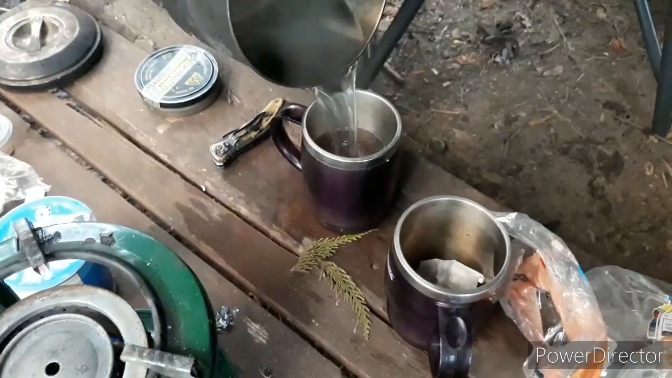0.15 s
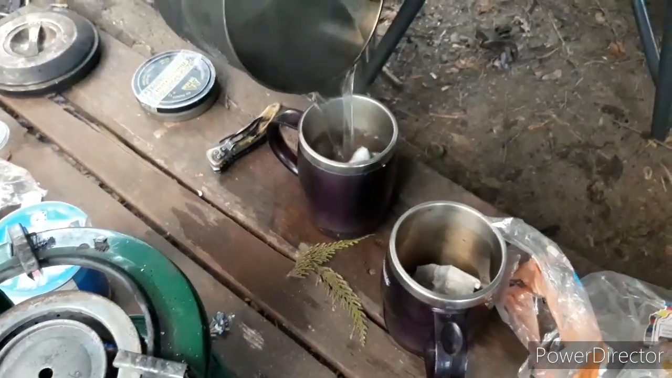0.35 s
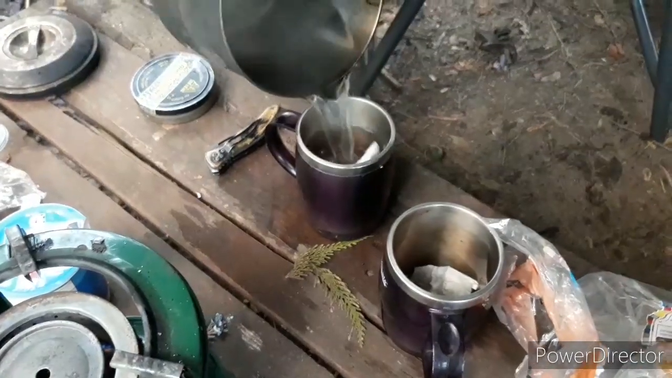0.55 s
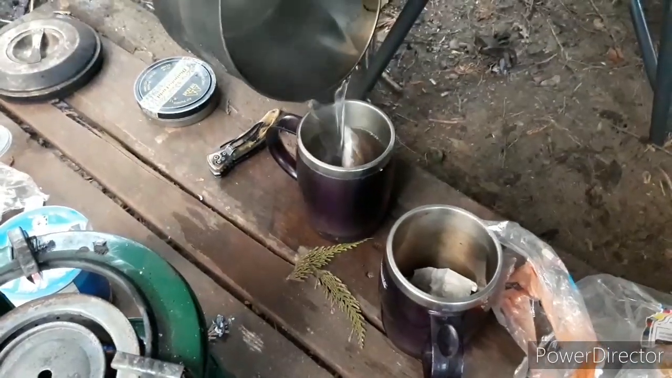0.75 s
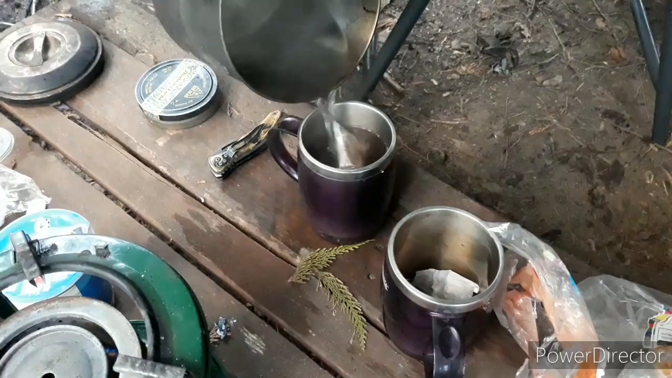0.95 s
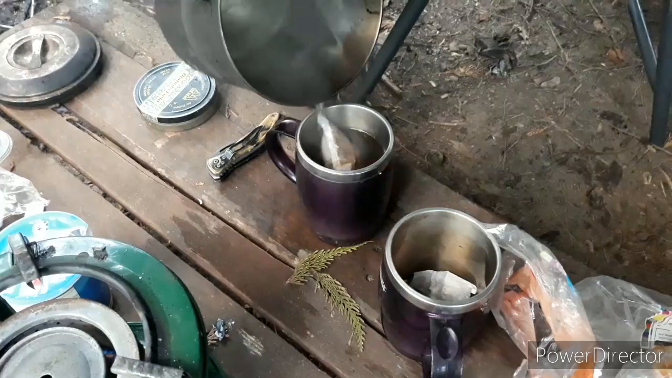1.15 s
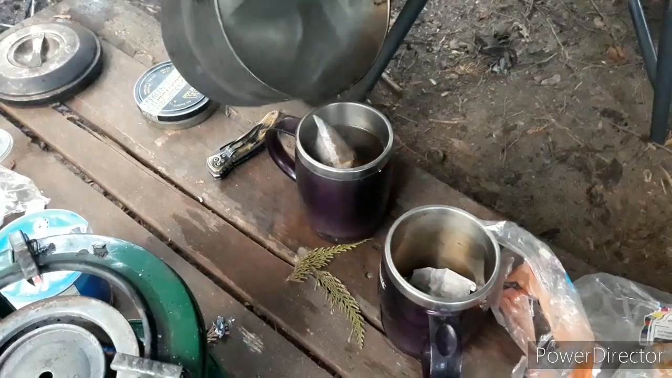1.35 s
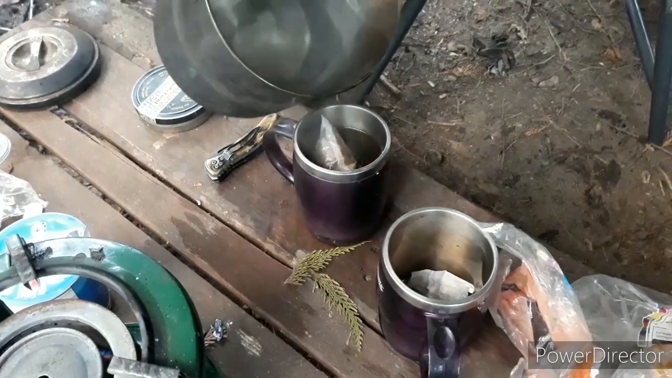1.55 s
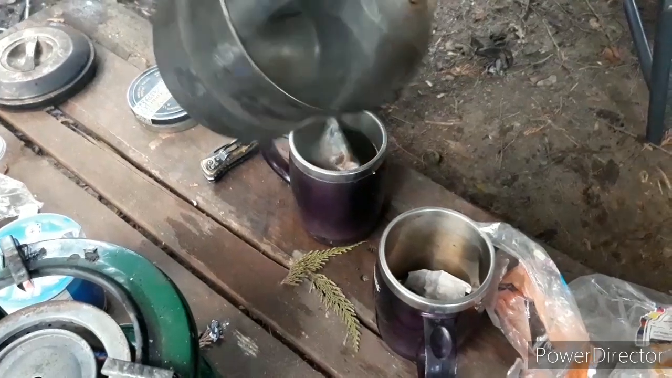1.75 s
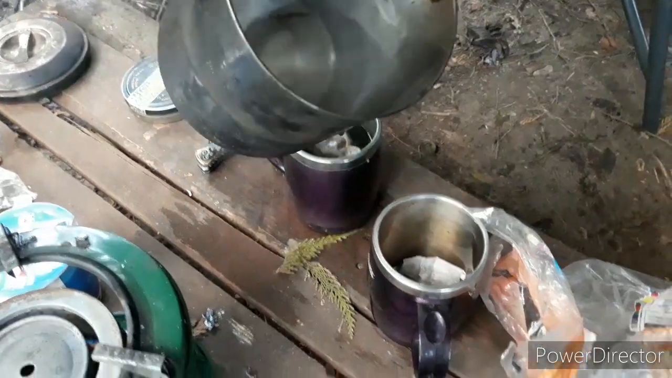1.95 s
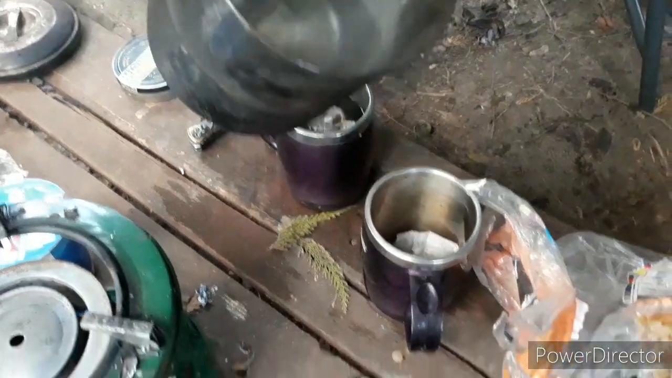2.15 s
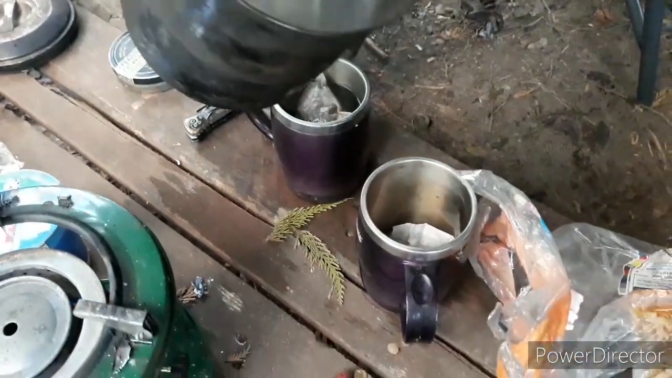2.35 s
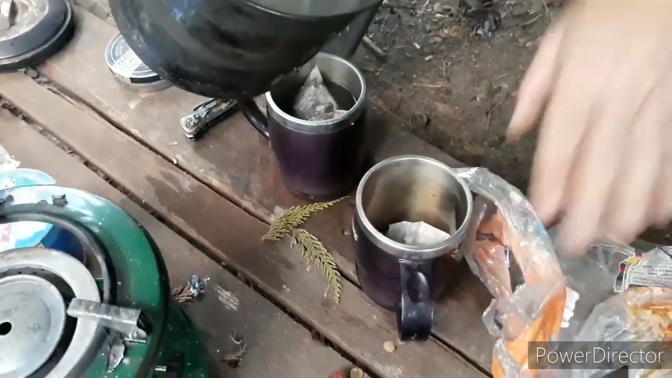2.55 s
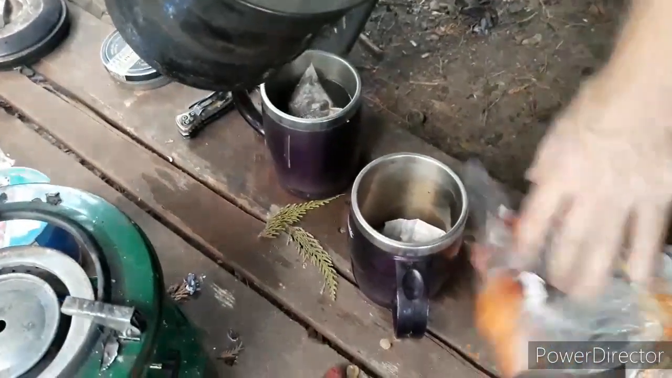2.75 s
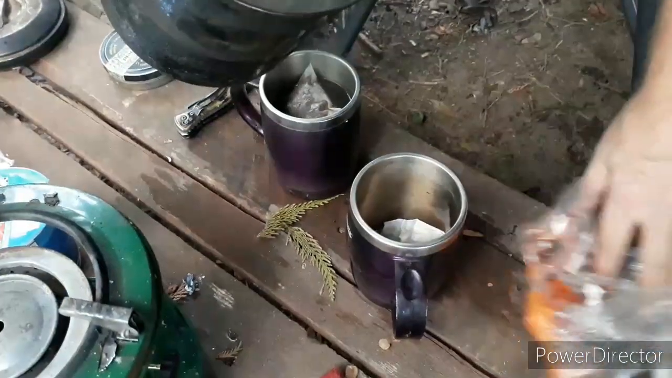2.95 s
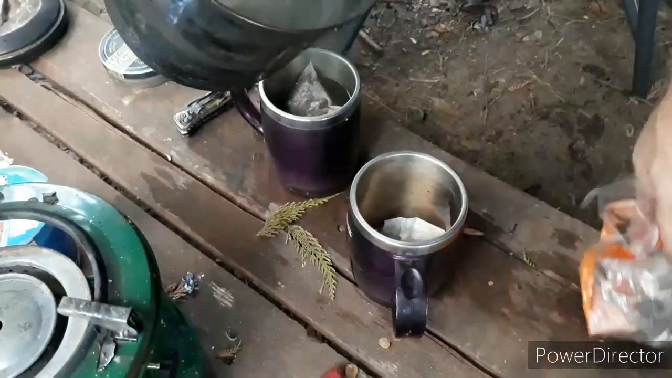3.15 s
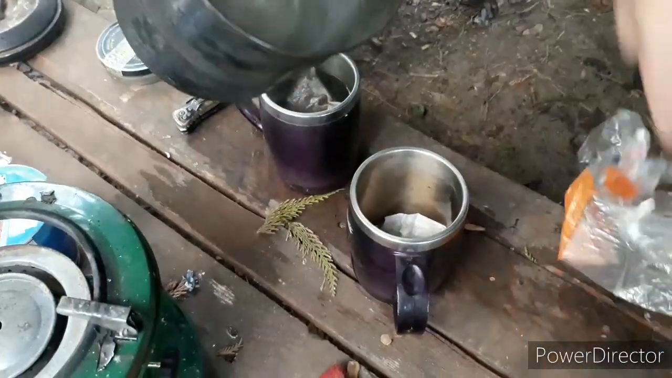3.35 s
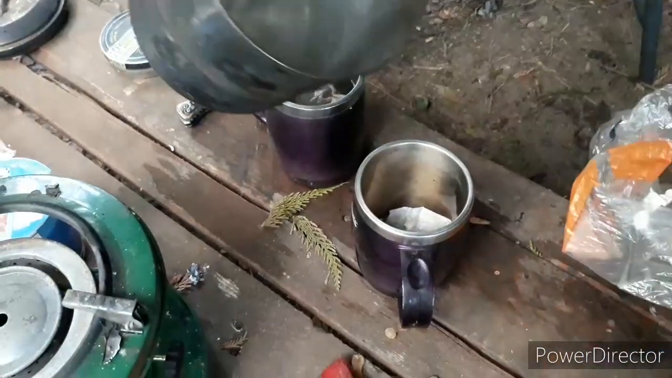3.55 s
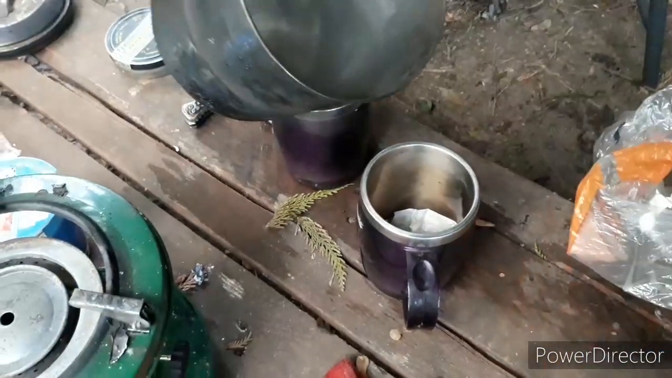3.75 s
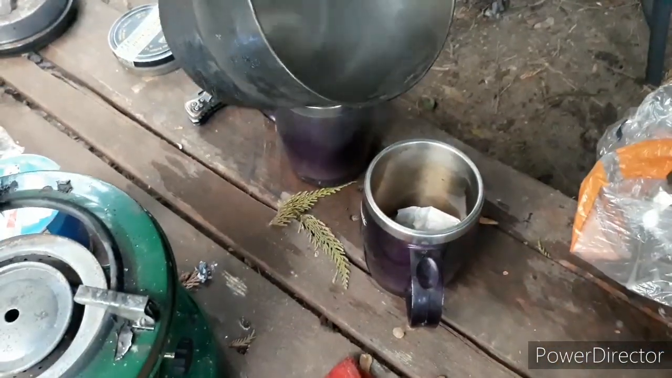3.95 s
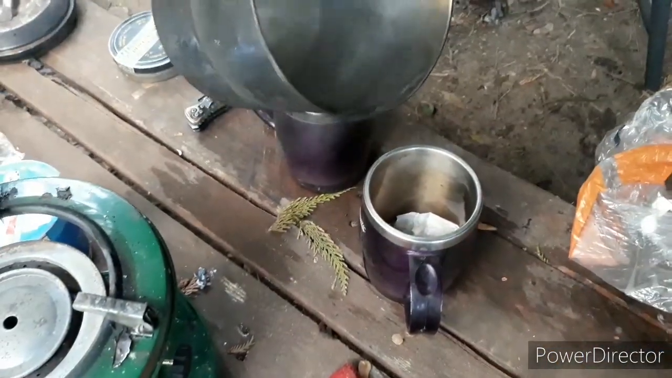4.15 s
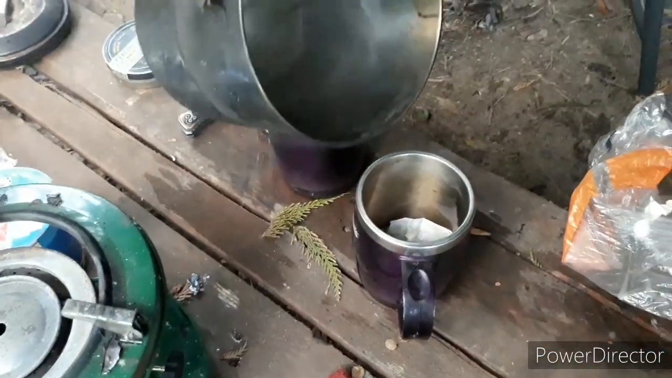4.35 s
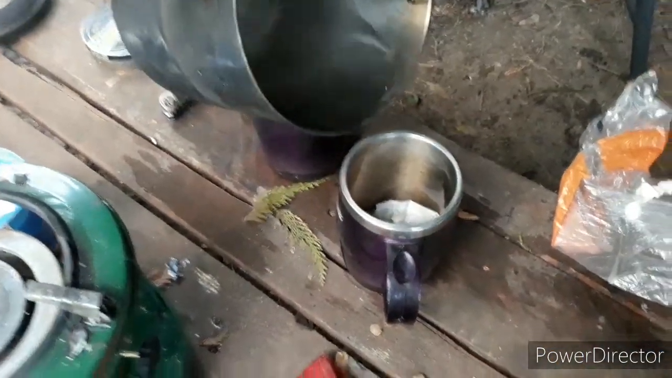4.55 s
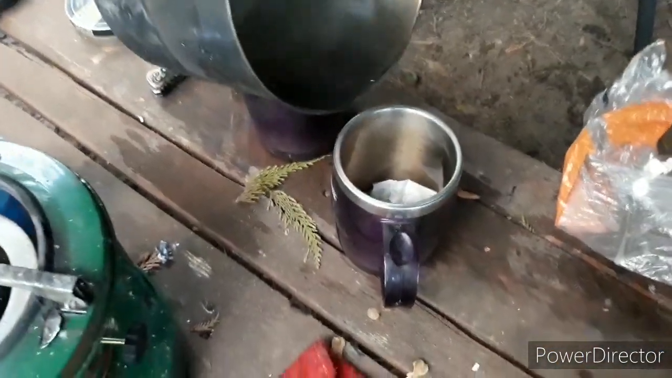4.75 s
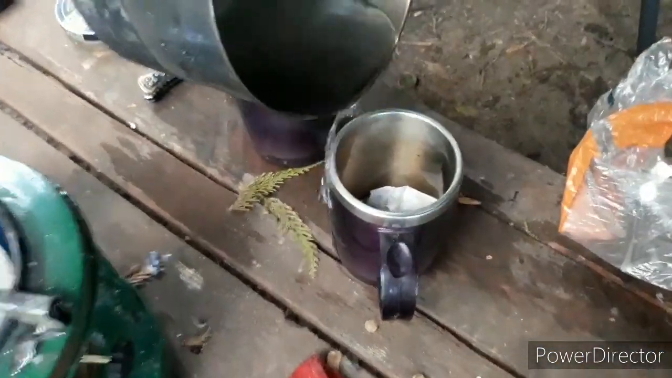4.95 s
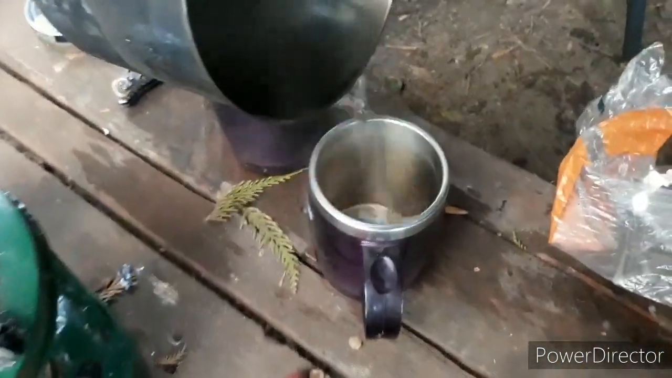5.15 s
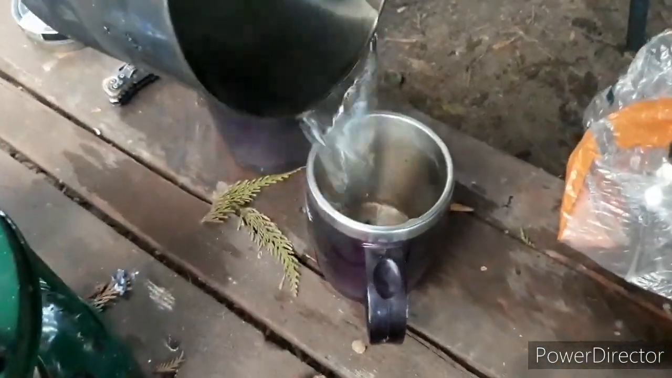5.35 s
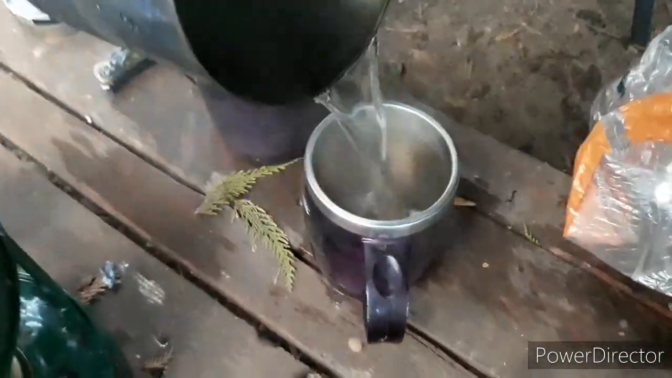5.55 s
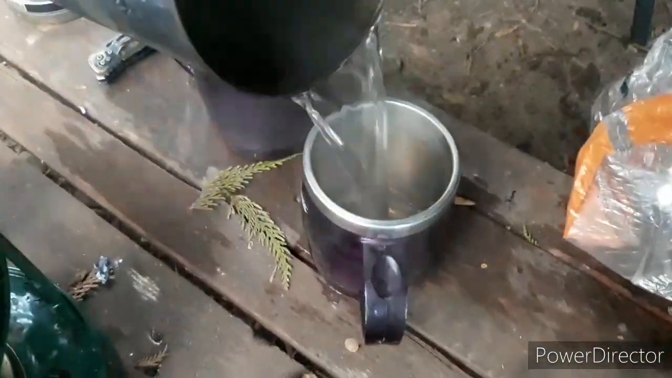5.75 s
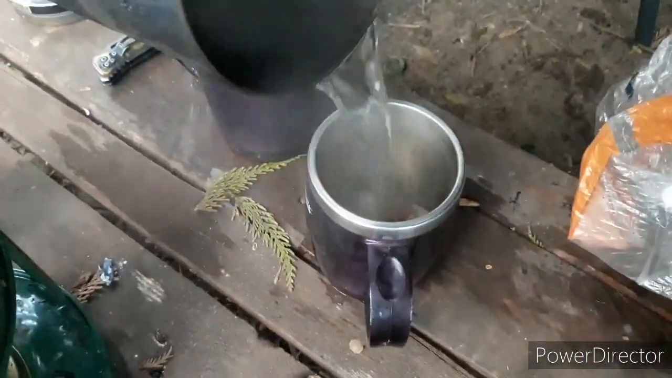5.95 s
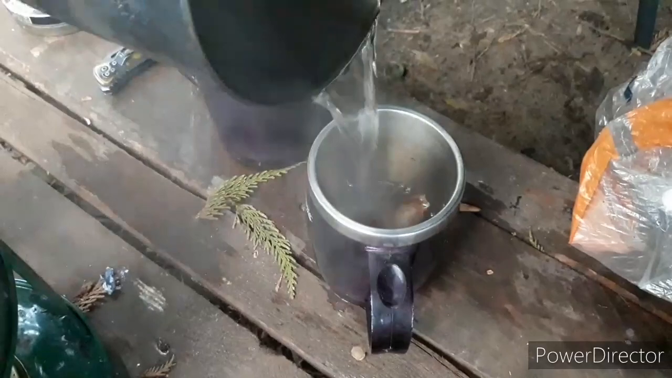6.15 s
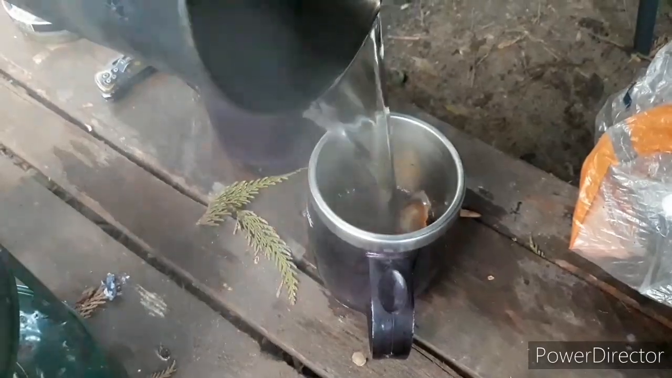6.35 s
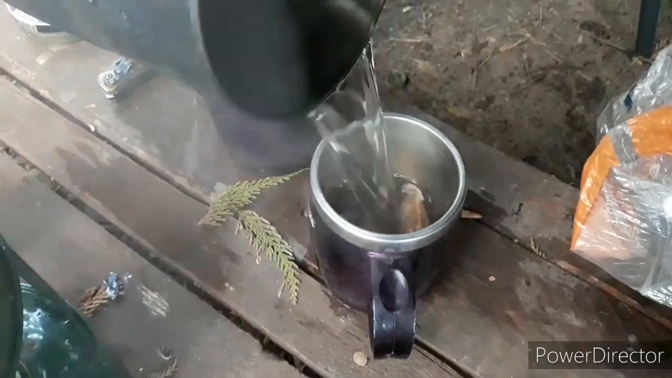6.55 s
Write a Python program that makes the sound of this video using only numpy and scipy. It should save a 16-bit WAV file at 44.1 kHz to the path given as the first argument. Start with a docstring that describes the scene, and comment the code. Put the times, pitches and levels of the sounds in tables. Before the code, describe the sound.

A close microphone catches quiet open air with steady low rumble and hiss. A nearly inaudible trickle and a few small plops accompany scuffing steps. Metalware clacks once, cloth brushes past, and a plastic bag is gripped and dragged in crisp bursts. After soft knocks, one piercing click stands out; then water dribbles and gushes into a hollow metal mug, its bubbling pitch rising.

```python
"""Hot water poured into steel mugs

Hot water runs from a metal kettle into two steel mugs on a plank table outdoors: damped grains of noise and tone.
The first mug fills almost silently while someone steps about, metalware clacks (struck modes), a sleeve
brushes past (filtered noise) and a plastic bag is pulled aside (clumped crackles with narrow resonances).
The kettle bumps a mug, a sharp click follows, and water spatters and then bubbles into the second mug."""
import sys
import numpy as np
from scipy import signal
from scipy.fft import rfft, irfft, next_fast_len
from scipy.io import wavfile
from scipy.ndimage import map_coordinates

SR = 44100
rng = np.random.default_rng(int(sys.argv[2]) if len(sys.argv) > 2 else 0)


def store_wav(level_fs):
    """Save 16-bit WAV to argv[1]."""
    pcm = np.round(np.clip(np.atleast_2d(level_fs), -1, 1) * 32767)
    wavfile.write(sys.argv[1], SR, pcm.T.astype(np.int16))


N = 291584  # length in samples

# Spectrum of water striking steel. Each row: frequency in Hz, relative density in dB per Hz.
SPATTER_COLOUR = [(880, -9), (1500, -16), (2470, -3), (3720, 3), (4710, -2), (5890, 2), (7230, -6.5),
                  (8710, 2.5), (10300, -7.5), (15500, -15)]
# The second pour: a dribble, then the full stream.
DRIBBLE_S, STREAM_S = 5.23, 5.52


def amp(db):
    """Level: decibels become an amplitude ratio."""
    return 10 ** (np.asarray(db) / 20)


def unit(x):
    """Mean power: scale to rms 1."""
    return x / np.sqrt(np.mean(x ** 2) + 1e-20)


def peaked(x):
    """Peak amplitude: scale to peak 1."""
    return x / np.abs(x).max()


def seconds(size):
    """Sampling: a time axis in seconds."""
    return np.arange(size) / SR


def wobble(rate):
    """Slow random modulation: a smooth curve through random knots, rate of them a second."""
    knots = rng.standard_normal(int(N * rate / SR) + 4)
    return map_coordinates(knots, [seconds(N) * rate])


def add(track, s, sound):
    """Superposition: mix a sound into the track at s seconds."""
    part = track[round(s * SR):][:len(sound)]
    part += sound[:len(part)]


def coloured(x, points):
    """Minimum-phase filtering: a causal response through (Hz, dB) points on a log axis."""
    size = 2 * next_fast_len(len(x) // 2 + 4096)
    hz, db = np.transpose(points)
    log_hz = np.log(np.fft.rfftfreq(size, 1 / SR) + 1)
    log_gain = np.log(amp(np.interp(log_hz, np.log(hz + 1), db)))
    # Folding the cepstrum onto positive times makes the filter causal.
    cepstrum = irfft(log_gain)
    cepstrum[1:size // 2] *= 2
    cepstrum[size // 2 + 1:] = 0
    return irfft(rfft(x, size) * np.exp(rfft(cepstrum)))[:len(x)]


def noise(points, size=N):
    """Random excitation: coloured noise of rms 1."""
    return unit(coloured(rng.standard_normal(size), points))


def fade(t, t60, attack):
    """Damping: a quick rise, then exponential decay by 60 dB in t60 seconds."""
    return np.exp(-np.log(1000) * t / t60) * (1 - np.exp(-t / attack))


def swell(s, hold, rise_db_per_s, fall_db_per_s):
    """Exponential growth and decay: a gain that rises to 1 at s seconds, holds, and falls away."""
    t = seconds(N) - s
    return amp(-rise_db_per_s * np.maximum(-t, 0) - fall_db_per_s * np.maximum(t - hold, 0))


def ring(modes, attack):
    """Modal vibration: a struck body's damped partials (Hz, dB, t60) with peak 1."""
    t = seconds(SR // 2)
    partials = 0
    for hz, db, t60 in modes:
        partials += amp(db) * fade(t, t60, attack) * np.sin(2 * np.pi * (hz * t + rng.random()))
    return peaked(partials)


def resonate(x, centre_hz, width_hz):
    """Resonance: one pole with a moving centre, rms 1."""
    turn = np.exp(2j * np.pi * np.cumsum(centre_hz) / SR)
    pole = np.exp(-np.pi * width_hz / SR)
    # Shift the centre down to 0 Hz, smooth there, and shift back.
    return unit((signal.lfilter([1], [1, -pole], x / turn) * turn).real)


def grains(rate, low_hz, high_hz, t60, spread_db, rise=0, size=256):
    """Random superposition: a steady rain of damped tones of uneven strength, rms 1; rise lifts their pitch."""
    when, pitch, strength, phase = rng.random((int(rate * N / SR), 4)).T[:, :, None]
    t = seconds(size)
    hz = low_hz + pitch * (high_hz - low_hz)
    cycles = hz * t * (1 + rise * t / t60)
    heavy = amp(-spread_db * np.log(.02 + strength))  # a few grains are much stronger than the rest
    waves = heavy * fade(t, t60, t60 / 20) * np.sin(2 * np.pi * (cycles + phase))
    places = (when * N).astype(int) + np.arange(size)
    return unit(np.bincount(places.ravel(), waves.ravel(), N)[:N])


def knock(db, grit_db, t60, hz, ring_db):
    """Impact: a dull blow with a brief ring, a gritty edge and a loose scuffing tail."""
    # Spectra of the body and of the gritty edge. Each row: frequency in Hz, relative density in dB per Hz.
    body_colour = [(71, -55), (120, -10.5), (588, -4), (917, -4.5), (1200, -8), (1320, -4.5), (1490, -9),
                   (2230, -11), (2770, -24), (3000, -14), (3900, -51), (6600, -120)]
    grit_colour = [(1500, -36), (2200, 3.5), (4000, 7), (8000, -2), (15000, -27)]
    scuff_colour = [(150, -16), (550, 6.5), (900, -2), (2500, -19.5)]
    t = seconds(SR // 3)
    body = noise(body_colour, len(t)) * fade(t, t60, attack=0.0014)
    tone = amp(ring_db) * np.sin(2 * np.pi * hz * t) * fade(t, 0.049, attack=0.00034)
    scuff = amp(-12) * noise(scuff_colour, len(t)) * fade(t, 0.37, attack=.01)
    grit = amp(grit_db - 4) * noise(grit_colour, len(t)) * fade(t, t60, attack=.002)
    return amp(db - 8.0) * (body + tone + scuff + grit)


def hollow_hz(s):
    """Cavity resonance: the air in the mug being filled at s seconds sounds higher as the second mug fills."""
    first_mug_hz, empty_mug_hz, rise_hz_per_s = 1176, 873, 165  # the first mug is nearly full
    second_mug_hz = empty_mug_hz + rise_hz_per_s * np.maximum(s - STREAM_S, 0)
    return np.where(s < DRIBBLE_S, first_mug_hz, second_mug_hz)


def flow():
    """Cushioning: gains of spatter, bubbling and drumming as water deepens; only the full stream traps air."""
    # The kettle tips and the stream surges. Each row: centre in seconds, extra drumming in dB.
    surges = [(5.78, 5), (6.12, 7.5), (6.49, 16)]
    surge_width_s, spatter_share, bubbling_share = 0.052, 0.37, 0.3
    dribble_db, opening_db_per_s = -7, 599
    t = seconds(N)
    stream = swell(STREAM_S, 0, opening_db_per_s, 0)
    dribble = amp(dribble_db) * swell(DRIBBLE_S, 0, opening_db_per_s, 0)
    running = np.maximum(stream, dribble)
    filling_s = np.maximum(t - STREAM_S, 0)
    surge_db = sum(db * np.exp(-.5 * ((t - s) / surge_width_s) ** 2) for s, db in surges)
    # Each layer: level in the empty mug in dB, its change in dB per second, its share of the surges.
    spatter = running * amp(-46.5 - 14 * filling_s + spatter_share * surge_db)
    bubbling = stream * amp(-54.5 + 0.7 * filling_s + bubbling_share * surge_db)
    drumming = running ** 2 * amp(-54.5 - 17 * filling_s + surge_db)
    return spatter, bubbling, drumming


def pour():
    """Jet impact and air entrainment: the stream spatters, drums on the base and excites the mug's hollow."""
    # Spectra of the stream's spatter and of the mug's base on the planks.
    # Each row: frequency in Hz, relative density in dB per Hz.
    stream_colour = [(1300, -15), (2200, -4), (2800, 3), (3800, -0.5), (4800, -7), (5650, 5), (6700, -9),
                     (8400, -0.5), (10000, -14.5), (15000, -11)]
    base_colour = [(47, -22), (80, -8), (151, 0.5), (215, -5.5), (474, -3), (700, -14), (910, -40),
                   (1540, -120)]
    spatter, bubbling, drumming = flow()
    droplets = grains(rate=4600, low_hz=1190, high_hz=14750, t60=0.0032, spread_db=6.0, size=128)
    fizz = unit(coloured(droplets, stream_colour))
    bubbles = grains(rate=1500, low_hz=583, high_hz=2130, t60=0.017, spread_db=3.2, rise=0.073, size=512)
    hollow = resonate(bubbles, hollow_hz(seconds(N)), width_hz=145)
    blows = grains(rate=400, low_hz=55, high_hz=687, t60=0.025, spread_db=2.5, size=768)
    drum = unit(coloured(blows, base_colour))
    # The big slow bubbles.
    gurgle = grains(rate=180, low_hz=297, high_hz=760, t60=0.022, spread_db=3, rise=0.085, size=1024)
    bubbly = bubbling * (amp(-2.1) * hollow + amp(-12) * gurgle)
    return amp(-2.5) * spatter * fizz + bubbly + amp(-1.0) * drumming * drum


def slaps():
    """Impact: the first gushes slap the bare bottom of the second mug, with little water to cushion them."""
    # Each row: start in seconds, level in dB, ring in Hz.
    gushes = [(5.226, -36.5, 650), (5.509, -27, 1090), (5.569, -29, 580), (5.586, -33, 1100),
              (5.624, -34, 660)]
    out = np.zeros(N)
    for s, db, hz in gushes:
        add(out, s, knock(db, grit_db=-4, t60=0.075, hz=hz, ring_db=0.5))
    return out


def sprays():
    """Many small impacts: water sprayed on the mug wall merges into decaying noise."""
    # Each row: start in seconds, level in dB.
    bursts = [(5.228, -21), (5.5051, -18.5), (5.5533, -22.5), (5.688, -25), (6.028, -23.5), (6.191, -28)]
    out, t = np.zeros(N), seconds(SR // 6)
    for s, db in bursts:
        add(out, s, amp(db - 14) * noise(SPATTER_COLOUR, len(t)) * fade(t, 0.06, attack=0.0017))
    return out


def plops():
    """Bubble resonance: clear single bubbles, each starting at the pitch of the mug's hollow and rising."""
    # Each row: start in seconds, level in dB.
    single_bubbles = [(0.186, -40), (0.207, -40), (0.356, -39.5), (6.046, -38), (6.123, -37.5),
                      (6.194, -37.5), (6.269, -37.5), (6.477, -35)]
    out, t = np.zeros(N), seconds(SR // 6)
    for s, db in single_bubbles:
        tone = np.sin(2 * np.pi * hollow_hz(s) * t * (1 + 2 * t))
        add(out, s, amp(db - 3.5) * peaked(tone * fade(t, 0.031, attack=0.0009)))
    return out


def strays(count):
    """Random arrivals: stray droplets (s, peak dB, Hz) that thin out as the mug fills."""
    span_s, top_db, spread_db, low_hz, high_hz = 0.95, -35, 8, 4540, 8970
    droplets = []
    for k, (when, small, pitch) in enumerate(rng.random((count, 3))):
        s = DRIBBLE_S + span_s * ((k + when) / count) ** 1.7  # the power crowds them early
        droplets.append((s, top_db - spread_db * small, low_hz + pitch * (high_hz - low_hz)))
    return droplets


def drops():
    """Drop impact: each drop or small tick is a short damped tone with a splat of noise."""
    # The loudest. Each row: start in seconds, peak in dB, pitch in Hz.
    loud_drops = [(2.507, -35.5, 3760), (4.092, -31.5, 4080), (4.519, -34, 4630), (5.23, -27.5, 6000),
                  (5.3083, -34, 8300), (5.489, -32, 6100), (5.5102, -24, 2630), (5.6113, -30.5, 7800),
                  (5.6867, -21.5, 9100), (5.7746, -26.5, 3800), (5.7846, -25.5, 3820), (6.4946, -30, 8100)]
    out, t = np.zeros(N), seconds(SR // 6)
    for s, db, hz in list(loud_drops) + strays(count=16):
        tick = np.sin(2 * np.pi * hz * t) * fade(t, 0.0059, attack=0.00052)
        splat = noise(SPATTER_COLOUR, len(t)) * fade(t, 0.0091, attack=0.00019)
        add(out, s, amp(db) * peaked(tick + amp(-9.5) * splat))
    return out


def click():
    """Contact force: one very short push that builds and lets go, heard through its rate of change."""
    # Each row: start in seconds, peak in dB.
    contacts = [(5.0415, -3.3)]
    # Each row: frequency in Hz, relative density in dB per Hz.
    click_colour = [(200, -28), (750, -20), (1050, -2), (1350, -16), (2000, 1.5), (2900, -7), (3400, 3.5),
                    (3900, 6.5), (5700, -19), (7600, -18), (8400, -9), (9700, -38), (15000, -46)]
    force = fade(seconds(SR // 4), 0.00058, attack=0.00017)
    out = np.zeros(N)
    for s, db in contacts:
        add(out, s, amp(db) * peaked(coloured(np.diff(force, prepend=0), click_colour)))
    return out


def thuds():
    """Radiation by motion: the planks flex at a low pitch, and only their change of position sounds."""
    # Each row: start in seconds, level in dB, pitch in Hz, t60 in seconds.
    table_blows = [(3.875, -35, 163, 0.07), (5.0435, -22.5, 122, 0.043), (5.61, -25, 119, 0.039),
                   (5.691, -34.5, 170, 0.076)]
    out, t = np.zeros(N), seconds(SR // 4)
    for s, db, hz, t60 in table_blows:
        flex = fade(t, t60, attack=0.0022) * np.cos(2 * np.pi * hz * t)
        add(out, s, amp(db - 8.5) * peaked(np.diff(flex, prepend=0)))
    return out


def clack():
    """Modal vibration: hard metalware gives bright, quickly damped modes and a noisy rattle."""
    # Each row: start in seconds, level in dB.
    hits = [(2.074, -15.5)]
    # Each row: frequency in Hz, relative level in dB, t60 in seconds.
    metal_modes = [(372, -20, 0.1), (884, -12.5, 0.062), (3240, -6, 0.036), (3884, -4.5, 0.049),
                   (4030, -5, 0.058), (5570, -6, .05), (5930, -5, 0.061), (6350, -4, 0.052),
                   (7730, -6, 0.062), (8091, -11, 0.085), (11000, -3, 0.031), (11540, -1, 0.025)]
    # Each row: frequency in Hz, relative density in dB per Hz.
    rattle_colour = [(88, -49), (150, -17), (381, -5), (509, -15), (1220, -6), (1400, -19), (1870, -9.5),
                     (2650, -25), (3040, 0.5), (3980, -5), (4310, -16), (6110, -4), (7000, -12), (7860, -9),
                     (15500, -18)]
    out, t = np.zeros(N), seconds(SR // 4)
    for s, db in hits:
        add(out, s, amp(db - 2.0) * ring(metal_modes, attack=.0005))
        rattle = noise(rattle_colour, len(t)) * fade(t, 0.075, attack=0.00036)
        add(out, s, amp(db - 12.0) * rattle)
    return out


def kettle_bump():
    """Modal vibration: the full kettle's soft bump is a few low modes over a blunt burst of noise."""
    # Each row: start in seconds, level in dB.
    bumps = [(3.872, -27)]
    # Each row: frequency in Hz, relative level in dB, t60 in seconds.
    kettle_modes = [(220, 1.5, 0.11), (513, -3, 0.2), (890, -2.5, 0.34), (935, -11, .087)]
    blunt_colour = [(50, -13), (170, 2), (350, -5), (900, -9), (1300, -26)]  # Hz, relative dB per Hz
    out, t = np.zeros(N), seconds(SR // 4)
    for s, db in bumps:
        add(out, s, amp(db - 5.5) * ring(kettle_modes, attack=0.0019))
        add(out, s, amp(db - 16) * noise(blunt_colour, len(t)) * fade(t, 0.24, attack=.003))
    return out


def handling():
    """Power summation: gains of crackle, fizz and folds from the drag and the grips; the folds settle last."""
    # The hand grips the bag. Each row: start in seconds, hold in seconds, crackle in dB,
    # fizz relative to the crackle in dB, folds relative to the crackle in dB.
    grips = [(2.75, 0.017, -35.5, -3.5, -7.5), (2.826, 0.081, -32, -8.5, -8.5),
             (2.987, 0.068, -35.8, -12.5, -8), (3.174, 0.054, -35.5, -9.5, -3),
             (3.299, 0.079, -42.5, -9, -5.5), (3.43, 0.058, -52.5, -12, -1.5)]
    rise_db_per_s, fall_db_per_s, folds_fall_db_per_s = 345, 264, 160
    # From the first touch on, the bag is dragged along and rustles softly between the grips.
    drag = swell(s=2.697, hold=0.542, rise_db_per_s=1500, fall_db_per_s=fall_db_per_s)
    moves = [[amp(-43) * drag, amp(-52) * drag, amp(-47.5) * drag]]
    for s, hold, db, fizz_db, folds_db in grips:
        grip = swell(s, hold, rise_db_per_s, fall_db_per_s)
        settling = swell(s, hold, rise_db_per_s, folds_fall_db_per_s)
        moves.append([amp(db) * grip, amp(db + fizz_db) * grip, amp(db + folds_db) * settling])
    return np.linalg.norm(moves, axis=0)


def bag():
    """Buckling: thousands of creases snap in clumps, and narrow steady resonances colour the crackle."""
    # Spectra of the creases, the finest fizz and the big folds.
    # Each row: frequency in Hz, relative density in dB per Hz.
    crease_colour = [(1180, -33), (2000, -13), (2260, -18.5), (2820, -11.5), (3020, -4), (3870, 0),
                     (4400, -2), (5130, -13.5), (5680, -4), (6240, -0.5), (7050, -9), (8680, -11),
                     (10000, -22.5), (13000, -38), (22000, -120)]
    fizz_colour = [(7000, -31), (10200, -9), (11300, -2), (13300, -4), (15300, -1)]
    fold_colour = [(35, -54), (60, -15.5), (184, -7), (324, -9.5), (760, -6), (1180, -9.5), (1500, -2.5),
                   (2020, -11), (2600, -7), (3380, -52), (5720, -120)]
    # Steady lines in the crackle. Each row: frequency in Hz, width in Hz, relative level in dB.
    narrow_resonances = [(3065, 25, -6), (3589, 18, 0), (3730, 16, 0), (3919, 16, 0), (4011, 20, -2),
                         (4426, 16, -3), (5675, 16, -2), (5882, 25, -2), (6144, 20, -3), (6369, 16, -3)]
    # The loudest creases snap singly. Each row: start in seconds, level in dB.
    snaps = [(2.6934, -25), (2.8514, -15), (2.8709, -13), (2.9043, -12), (2.9228, -15), (3.1328, -20),
             (3.3702, -22), (3.488, -28), (3.5164, -31), (3.5284, -31), (3.5833, -35)]
    crackle_gain, fizz_gain, folds_gain = handling()
    t = seconds(SR // 8)
    creases = grains(rate=7800, low_hz=1500, high_hz=16300, t60=0.0013, spread_db=2.5, size=128)
    clumped = creases * amp(1.66 * wobble(70))
    rustle = crackle_gain * unit(coloured(clumped, crease_colour))
    tail = 0
    for hz, width, db in narrow_resonances:
        tail += amp(db) * np.exp(-np.pi * width * t) * np.sin(2 * np.pi * hz * t)
    ringing = unit(signal.fftconvolve(rustle, tail)[:N]) * np.std(rustle)
    # Fewer, sharper creases.
    sparkle = grains(rate=3000, low_hz=7000, high_hz=16000, t60=.001, spread_db=4.0, size=64)
    fizz = fizz_gain * unit(coloured(sparkle, fizz_colour))
    big_creases = grains(rate=2000, low_hz=50, high_hz=2670, t60=0.0048, spread_db=0)
    folds = folds_gain * unit(coloured(big_creases, fold_colour))
    out = amp(3.0) * rustle + amp(-12) * ringing + amp(-0.5) * fizz + amp(-0.5) * folds
    for s, db in snaps:
        snap = peaked(noise(crease_colour, len(t)) * fade(t, .006, attack=.0007))
        add(out, s, amp(db - 1) * snap)
    return out


def sleeve():
    """Friction noise: a sleeve brushes past in a short swish, gathering speed and stopping short."""
    # Each row: frequency in Hz, relative density in dB per Hz.
    cloth_colour = [(290, -52), (500, -16), (815, -17), (888, -16), (1120, -11), (1770, -12.5),
                    (5750, -4.5), (9650, -15), (15500, -17)]
    stroke = swell(s=2.288, hold=0.027, rise_db_per_s=211, fall_db_per_s=550)
    return amp(-39) * stroke * noise(cloth_colour)


def steps():
    """Successive impacts: footsteps, heel then duller toe; the last row is a sharper, nearly single knock."""
    # The last row is perhaps the kettle touching the table or a mug, its second blow nearly absent.
    # Each row: first blow's start in seconds, its level in dB, second blow's level in dB,
    # first blow's grit in dB, its ring in Hz, level of that ring in dB.
    blows = [(1.041, -30, -35, -3, 1300, -0.5), (1.474, -31.5, -41.5, -3.5, 1160, 3.5),
             (2.549, -29.5, -36.5, -5, 803, -3), (4.059, -31.5, -38, -3, 670, -5),
             (4.205, -29, -55, -2, 1162, 7.5)]
    heel_to_toe_s = .052
    out = np.zeros(N)
    for s, first_db, second_db, grit_db, hz, ring_db in blows:
        add(out, s, knock(first_db, grit_db, t60=0.095, hz=hz, ring_db=ring_db))
        add(out, s + heel_to_toe_s, knock(second_db, grit_db=-13, t60=0.15, hz=634, ring_db=2))
    return out


def trickle():
    """Bubble resonance: the first mug bubbles ever more faintly until the kettle lifts."""
    start_db, fall_db_per_s, lift_s, lift_db_per_s = -61, 2.6, 4.3, 40
    bubbles = grains(rate=160, low_hz=766, high_hz=1555, t60=0.016, spread_db=3.0, rise=0.084, size=1024)
    fading = amp(start_db - fall_db_per_s * seconds(N))
    return bubbles * fading * swell(0, lift_s, 0, lift_db_per_s)


def air():
    """Stationary noise: outdoor rumble and hiss, each drifting very slightly in level."""
    # Each row: frequency in Hz, relative density in dB per Hz.
    rumble_colour = [(18, -27), (30, -25), (54, 1), (156, -4), (282, -8.5), (348, -4), (397, -11),
                     (700, -7.5), (910, -33), (1540, -120)]
    hiss_colour = [(300, -30), (560, -14.5), (680, -7), (830, -0.5), (1450, -1.5), (2000, -4), (2600, -9.5),
                   (3600, -1), (5000, -8.5), (6000, -7), (7200, -11.5), (8400, -5), (9700, -15),
                   (15000, -12.5)]
    rumble = amp(-64 + 0.15 * wobble(3.8)) * noise(rumble_colour)
    hiss = amp(-52.0 + 0.11 * wobble(1.7)) * noise(hiss_colour)
    return rumble + hiss


def scene():
    """Superposition: everything is close and dry, and reaches both channels alike."""
    water = pour() + slaps() + sprays() + plops() + drops() + trickle()
    metal_and_table = click() + thuds() + clack() + kettle_bump()
    mono = water + metal_and_table + bag() + sleeve() + steps() + air()
    return np.array([mono, mono])


def record(dry):
    """Band limiting: nothing passes from the top frequency upward."""
    top_hz = 15520
    size = next_fast_len(N + 8192)
    passed = np.fft.rfftfreq(size, 1 / SR) < top_hz
    return irfft(rfft(dry, size) * passed, size)[:, :N]


dry = scene()
out = record(dry)
store_wav(out)
```